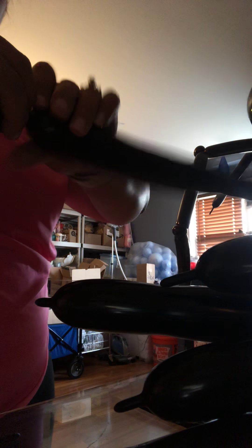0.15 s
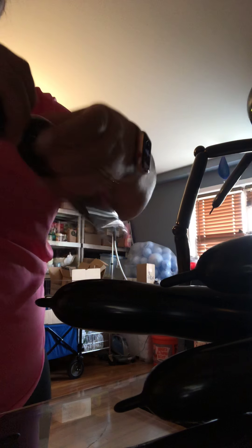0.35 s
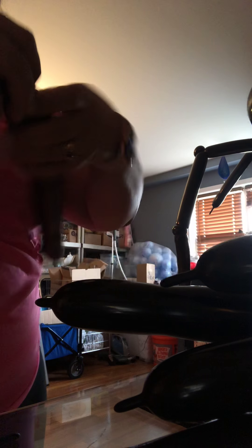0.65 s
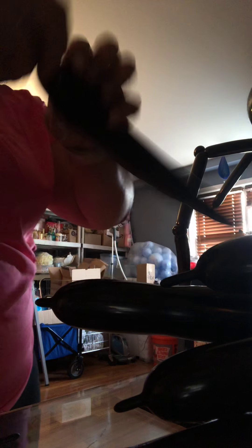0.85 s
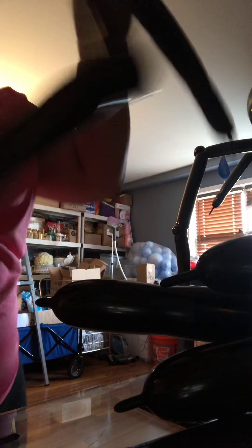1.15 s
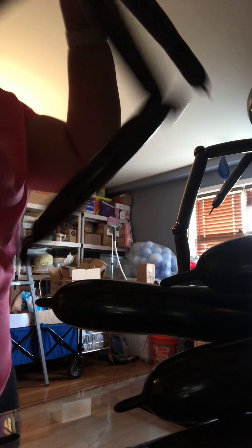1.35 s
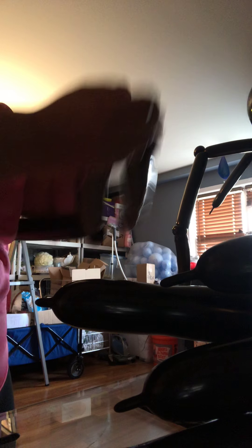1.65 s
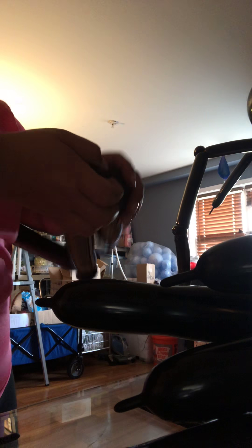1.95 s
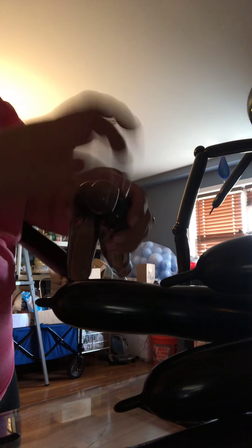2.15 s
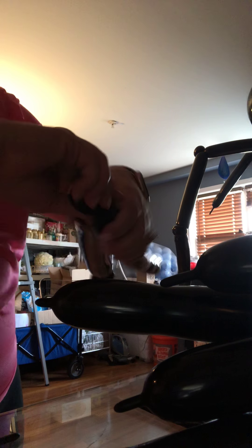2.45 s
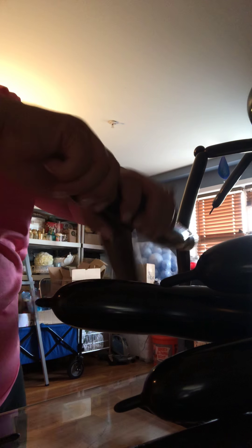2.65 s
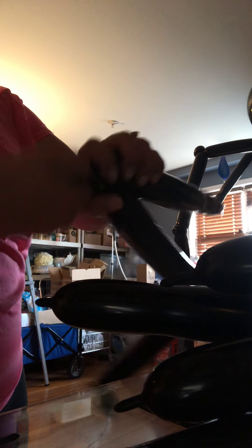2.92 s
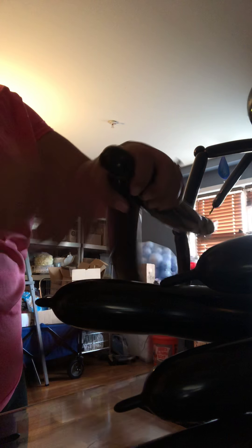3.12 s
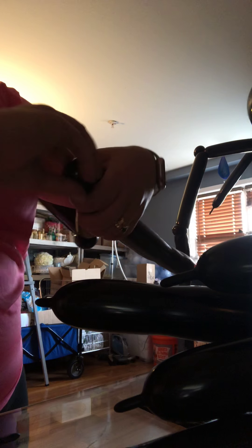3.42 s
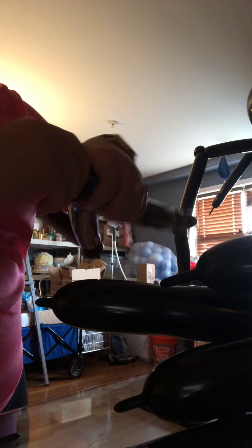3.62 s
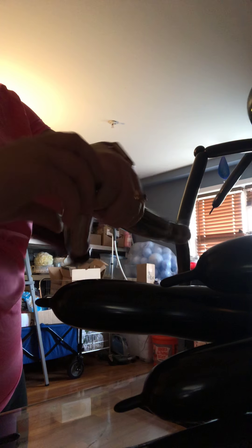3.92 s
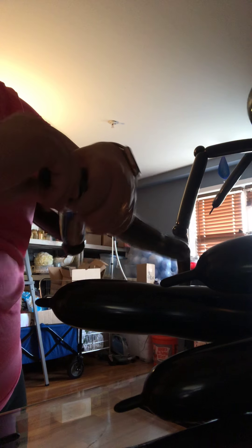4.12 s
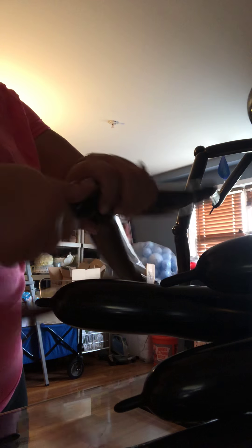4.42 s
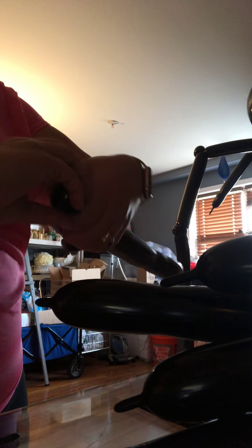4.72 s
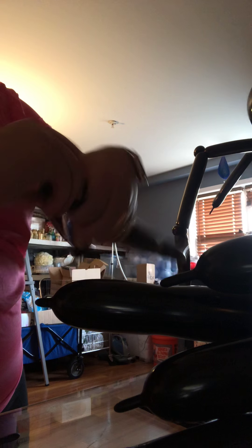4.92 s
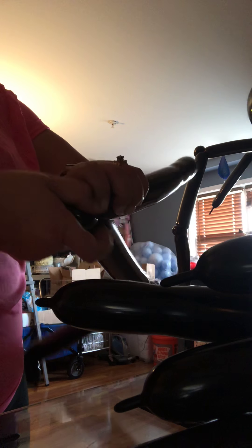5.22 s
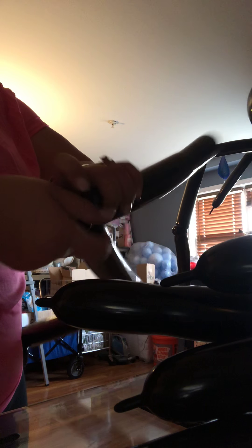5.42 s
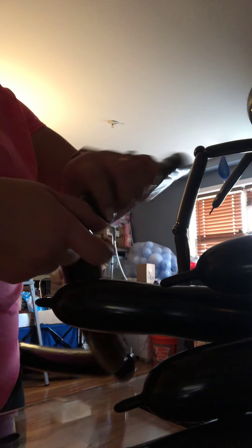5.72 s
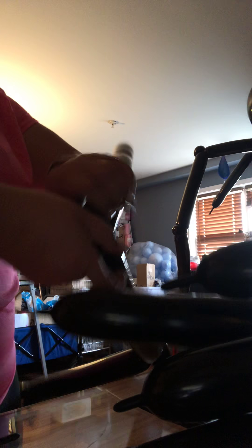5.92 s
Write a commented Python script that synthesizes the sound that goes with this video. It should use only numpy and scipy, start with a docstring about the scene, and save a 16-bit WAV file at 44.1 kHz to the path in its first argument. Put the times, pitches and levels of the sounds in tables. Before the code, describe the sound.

Close rubbery snapping, creaking and rubbing of a long balloon being pinched and twisted, with dull airy thumps in a quiet room.

```python
"""Hands twist a long latex balloon close to a phone microphone, in a furnished room with faint noise.
Scattered slips of the sticking rubber snap and ring the taut skin; the air tube thuds when pinched or bumped.
Snaps crowd together at 2.5 s; a hard thud and thin sine tones (squeaks, a held ring) come near 3 s. From 3.5 s
snaps and creaks (grainy resonant noise) thicken until past 5 s, then thin out to a last few by 6 s.
Throughout, fingers rub over the latex as gritty noise with a hiss above and a rumble below."""
import sys
import numpy as np
from scipy import signal
from scipy.fft import rfft, irfft, next_fast_len
from scipy.io import wavfile
from scipy.ndimage import uniform_filter1d, map_coordinates

SR = 44100
rng = np.random.default_rng(int(sys.argv[2]) if len(sys.argv) > 2 else 0)


def put_to_file(sound):
    """Save the sound as 16-bit audio at rate SR, in the file named by the first command-line argument."""
    columns = np.atleast_2d(sound).T  # one column per channel
    safe = np.clip(columns, -1, 1)
    whole_steps = np.round(safe * 32767)
    wavfile.write(sys.argv[1], SR, whole_steps.astype(np.int16))


N = 267844  # samples

# room and microphone noise, relative spectrum: (frequency [Hz], density [dB per Hz])
AIR_SPECTRUM = [(15, -35), (28, -19), (55, 18.5), (335, -8), (695, -5), (1440, -12), (3520, -6),
                (4140, 6.5), (4740, -10), (16000, -17)]
# the furnished room's decay: (frequency [Hz], t60 [s])
ROOM_DECAY = [(200, 0.27), (1400, 0.46), (3700, 0.32), (10000, 0.23)]
# thin tones, squeaks and a held ring: (start [s], length [s], pitch [Hz], level [dB])
THIN_TONES = [(2.92, 0.025, 1205, -42), (2.974, 0.085, 1180, -42.5), (3.16, 0.17, 1700, -42)]
# fingers on latex: (time [s], body level [dB], hiss level [dB], rumble level [dB])
RUBBING_LEVELS = [(0.0, -43, -49, -43.5), (0.29, -48.5, -56, -57), (0.83, -45, -48.5, -58),
                  (1.32, -46, -54, -56), (1.72, -43, -59, -45.5), (2.59, -47, -58, -55.5),
                  (2.74, -44.5, -68, -53), (3.09, -44, -51, -43), (3.36, -47, -62, -47.5),
                  (3.65, -43.5, -65, -44.5), (3.97, -53, -71, -47), (4.34, -40, -56, -47.5),
                  (4.51, -47, -71, -42), (4.9, -44, -58, -53.5), (5.09, -42, -51, -45.5),
                  (5.27, -37, -64, -42.5), (5.6, -43.5, -49, -48.5), (6.07, -41.5, -47, -47.5)]
# resonances of the taut latex: (centre [Hz], width [Hz], level [dB])
SKIN_MODES = [(1370, 640, 2.5), (2470, 1470, 4.5), (3468, 1040, 1), (4235, 240, 1), (5290, 310, -2.5)]
# relative spectrum of the latex hiss: (frequency [Hz], density [dB per Hz])
HISS_SPECTRUM = [(4500, -120), (6000, 1), (7400, 2), (9000, -4), (15500, -6.5)]
# resonances of the air tube: (centre [Hz], width [Hz], level [dB])
TUBE_MODES = [(72, 36, -2), (140, 16.5, 2), (218.8, 32, 3), (368, 51, 3.5), (510, 50, -3.5), (864, 470, -9)]
# pinches and bumps of the air tube: (time [s], nominal peak [dB], nominal pitch [Hz])
THUDS = [(0.088, -26.5, 680), (0.094, -27.5, 88), (0.114, -38, 342), (0.237, -17.5, 219),
         (0.429, -23.5, 469), (0.703, -23, 376), (0.837, -39, 645), (1.101, -37, 80.4), (1.619, -33, 127),
         (1.68, -36.5, 197), (1.786, -43, 300), (1.803, -32.5, 860), (1.876, -37, 347), (1.879, -36.5, 794),
         (1.956, -34, 870), (2.353, -30, 865), (2.382, -32.5, 840), (2.637, -31, 410), (2.745, -36.5, 207),
         (2.899, -26, 139.3), (2.925, -31, 148), (2.969, -32.5, 222), (2.995, -39, 250), (3.09, -11.5, 370),
         (3.09, -22, 860), (3.328, -22.5, 295), (3.336, -16.5, 420), (3.621, -36, 610), (3.938, -25.5, 350),
         (4.471, -30, 610), (4.576, -32.5, 370), (4.662, -19.5, 374), (4.969, -22.5, 554),
         (4.981, -20, 960), (5.186, -40, 410), (5.289, -52, 197), (5.793, -22, 218), (5.797, -31, 101),
         (6.05, -25, 560)]
# the skin rings on after a big snap: (start [s], ring [Hz], level [dB], t60 [s])
AFTER_RINGS = [(0.518, 2050, -37, 0.31), (0.869, 1373, -33.5, 0.72), (2.116, 580, -43.5, 1),
               (2.116, 1524, -32, 0.47), (2.116, 2970, -37, 0.75), (3.094, 924, -31.5, 0.51),
               (3.097, 1340, -29.5, 0.46), (3.12, 1630, -42.5, 1), (3.632, 1314, -37.5, 0.64),
               (3.805, 1250, -39, 0.23), (5.903, 1450, -43, 0.55)]
# modes of that ringing: (multiple of the ring [1], width as a share of the ring [1], level [dB])
AFTER_MODES = [(0.42, 0.21, -9.5), (1, 0.11, 8.5), (1.21, 0.089, 3), (1.42, 0.14, -1.5), (1.85, 0.081, -1)]
# hoarse creaks, where the slips run together:
# (start [s], end [s], resonance [Hz], first level [dB], last level [dB])
CREAKS = [(0.836, 0.873, 1440, -25.5, -30), (1.164, 1.255, 4160, -68, -58), (1.345, 1.443, 4200, -49, -54),
          (1.74, 1.814, 2170, -59, -41), (2.347, 2.376, 1880, -34, -47), (2.525, 2.606, 2060, -67, -34),
          (3.578, 3.614, 2240, -38, -51), (3.927, 3.963, 2470, -34, -29), (4.001, 4.03, 4380, -34, -52),
          (4.14, 4.207, 1950, -27, -35), (4.233, 4.283, 4350, -31, -38.5), (4.372, 4.464, 2720, -25, -31.5),
          (4.456, 4.531, 2440, -41, -25.5), (4.924, 4.949, 4300, -27, -27), (4.982, 5.02, 3280, -14, -45),
          (5.065, 5.081, 2290, -26.5, -15.5), (5.229, 5.285, 1940, -25, -42), (5.328, 5.37, 760, -43, -42),
          (5.419, 5.517, 800, -47, -43), (5.732, 5.771, 2240, -24.5, -42), (6.038, 6.067, 2640, -33.5, -33)]
# single stick-slip snaps:
# (time [s], nominal peak [dB], low ring [Hz], brightness [dB], crack against the peak [dB])
SLIPS = [(0.0034, -17.5, 2210, 4, -2.5), (0.028, -15.5, 2010, 7.5, -14), (0.0876, -16, 2060, 7, -4),
         (0.2406, -31.5, 1400, -7, -5), (0.38, -17, 2390, 4.5, -4.5), (0.4808, -25, 1560, -2, -33),
         (0.5157, -4.5, 2230, 8, -5.5), (0.7037, -14, 2420, 5, -8.5), (0.8086, -22, 1420, 16, -1),
         (0.858, -11, 1590, 2, -15), (0.8626, -7.5, 1530, 1, -26), (1.1216, -24.5, 2660, 4, -2),
         (1.4224, -24, 1750, 8, 1.5), (1.449, -24, 1695, 1, -3.5), (1.746, -24.5, 2240, 2, -20),
         (1.7816, -18, 2160, -3, -11), (1.8034, -18, 2260, 7, -8), (1.961, -20, 1650, -6, -29),
         (1.9964, -20.5, 2340, 5, 2), (2.2194, -22.5, 1820, 11, -6.5), (2.3833, -24, 1900, 0, -7),
         (2.4005, -17.5, 2310, 7, -1), (2.4366, -36, 2380, 0, 12), (2.447, -17, 2190, 17, -10),
         (2.4686, -17, 2520, 20, -6), (2.4957, -17, 2400, 10, -4), (2.508, -15.5, 2310, 7, -2),
         (2.5235, -9.5, 2120, 4.5, -4), (2.5429, -8.5, 2250, 1, -6), (2.5486, 1, 2280, 20, -6),
         (2.5593, -6.5, 2114, 2.5, -14), (2.8878, -15.5, 1660, 8, 3), (2.8978, -7.5, 2230, 10, -6.5),
         (3.0419, -14, 2470, 8.5, -14), (3.111, -17, 1760, -3, -3), (3.327, -32, 3240, -9, -12),
         (3.3381, -15, 2390, -24, -30), (3.5154, -12.5, 2220, -5, 0.5), (3.5695, -2.5, 2544, 2, -8.5),
         (3.628, 2, 2110, 10.5, -29), (3.68, -7.5, 2380, 12, -9), (3.697, -16, 2250, -7, -4),
         (3.716, -13, 2320, 6, -8.5), (3.7312, -15.5, 2250, 4, -13), (3.7598, -16, 2234, 2, -13),
         (3.801, -14.5, 2243, -4, -10), (3.9188, -16, 2300, 3, -5), (3.9284, -14, 2320, 3, -3),
         (3.938, -8, 2540, 6, -9), (3.9439, -3, 2017, 7, -10.5), (3.9592, -7, 2380, 7, -1),
         (3.9924, -20, 2060, 12, -2), (4.0045, -3, 2220, 9.5, -9), (4.0116, -9.5, 2080, 13, -5),
         (4.0367, -13, 2560, 4, -11), (4.1276, -12, 2200, 18, -9.5), (4.141, -9.5, 1920, 15, -5),
         (4.197, -10, 2240, 5, 3.5), (4.206, -9, 2360, 9, -1), (4.2332, -17, 2270, 15, -9),
         (4.3176, -3.5, 2575, 10, -10), (4.374, -4, 2223, 2.5, -2.5), (4.391, -4.5, 2026, 4.5, -18),
         (4.4081, -3.5, 2670, 3, -5), (4.4357, -14, 2550, 11, -12), (4.4574, -18, 2110, 0, -19),
         (4.4703, -2.5, 2495, 4.5, -3), (4.5079, -13, 2380, -1, -4), (4.668, -32, 1170, 0, -11),
         (4.8318, -7.5, 2148, -1, -4), (4.908, -17, 2210, 5, -3), (4.9146, -10.5, 2235, 4, -6),
         (4.9205, -12, 2180, 7, -1), (4.9594, -16, 2370, 0, -3), (4.965, -4.5, 2710, 28, -1),
         (4.9682, -2.5, 2657, 3.5, -5), (4.9809, 3.5, 2270, 7.5, -27), (5.122, -21.5, 2500, 2, -12),
         (5.1334, -12.5, 2380, 16, -13), (5.1497, -7, 2310, 9, -10), (5.1702, -6, 2460, 13, -8),
         (5.1908, 0, 2170, 3.5, -16), (5.1961, -8, 2260, 1, -10), (5.2151, -4, 2298, -2.5, -3),
         (5.232, -17, 2240, -2, -5), (5.2616, -15, 2530, 8, -10), (5.346, -24.5, 2200, -3, -21),
         (5.384, -9.5, 2320, 6.5, -11), (5.6087, -23.5, 2380, 7, -23), (5.7356, -9.5, 2090, 11, -21),
         (5.754, -17.5, 2250, 9, -8), (5.7835, -22, 2400, 8, -4), (5.8396, -4.5, 2360, 3.5, -6.5),
         (5.8505, -3, 2640, 2.5, -14), (5.8728, -7.5, 2640, 8, -10.5), (5.8991, 0.5, 2530, 3.5, -14.5)]
# runs of slips at a nearly steady pace: (start [s], end [s], pace [slips per s], first level [dB],
# last level [dB], mean low ring [Hz], mean brightness [dB], mean crack against the peak [dB])
RUNS = [(0.838, 0.844, 277, 0.5, -15, 1573, 1.5, -11), (2.1092, 2.12, 258, -1, -12.5, 2394, -4.5, -10.5),
        (3.0923, 3.098, 490, -2.5, -15.5, 1730, 2.5, -5), (2.577, 2.598, 204, -8.5, -5.5, 2343, 9.5, -8.5),
        (3.577, 3.602, 195, -11, -16.5, 2240, -3, -7), (4.1502, 4.175, 170, -11, -16, 2097, 6, -0.5),
        (4.9255, 4.944, 210, -12.5, -26, 4250, -10, -4), (5.02, 5.038, 115, -13, -16, 2600, 8, -12),
        (5.0415, 5.063, 225, -14.5, -13.5, 2410, 11, -6.5), (1.222, 1.237, 92, -33, -29, 2800, 27, -24),
        (4.626, 4.682, 77, -31, -33, 2260, -13, -17), (4.703, 4.788, 48, -23.5, -26, 2150, 1.5, -12),
        (5.502, 5.54, 62, -24, -14.5, 2230, 9, -8), (6.0518, 6.066, 140, -11.5, -14.5, 2353, 1.5, -5)]

TONE_FADE_DB_PER_S, TONE_WAVER = 50, 0.004  # waver as a share of the pitch
THUD_FLOOR_HZ = 63  # the tube radiates little below
SLAP_DB, SLAP_T60_S = -3, 0.047  # skin slap against a thud
SLAP_LOW_HZ, SLAP_HIGH_HZ = 600, 3570
RASP_DB = 0  # broad rasp against a creak's resonance
CRACK_BODY_DB = -7.5  # gain of a crack's mid band beside its hiss
# scatter within a run: share of a gap, dB, share of the pitch
PACE_JITTER, SIZE_SCATTER_DB, RING_SCATTER = 0.06, 1.5, 0.038
TOP_HZ = 16000  # the microphone's band limit


def amp(db):
    """Gain of a level in dB."""
    return 10 ** (np.asarray(db) / 20)


def unit(x):
    """x at rms 1."""
    return x / np.sqrt(np.mean(x ** 2) + 1e-20)


def along(points, hz):
    """Values of (Hz, value) points read on a log frequency axis."""
    f, v = np.transpose(points)
    return np.interp(np.log(hz + 1), np.log(f + 1), v)


def curves(rows):
    """One value per sample for each column after the time."""
    s, *cols = np.transpose(rows)
    return [np.interp(np.arange(N) / SR, s, c) for c in cols]


def wobble(rate):
    """A smooth random curve, rate knots a second."""
    knots = rng.standard_normal(int(N * rate / SR) + 4)
    return map_coordinates(knots, [np.arange(N) * rate / SR])


def filtered(x, response):
    """x times a complex response of frequency."""
    m = next_fast_len(N + SR // 2)
    return irfft(rfft(x, m) * response(np.fft.rfftfreq(m, 1 / SR)), m)[..., :N]


def placed(times, shapes):
    """Each row of shapes laid down at its time."""
    at = np.round(times * SR).astype(int)[:, None] + np.arange(shapes.shape[1])
    return np.bincount(at.ravel(), shapes.ravel(), N + SR)[:N]


def modes(table):
    """The causal response of a set of resonances, alternating in sign."""
    def response(f):
        return sum((-1) ** k * amp(db) * 1j * f * w / (c * c - f * f + 1j * f * w)
                   for k, (c, w, db) in enumerate(table))
    return response


def slap_band(f):
    """The broad middle band in which struck skin speaks."""
    return 1j * f / (SLAP_LOW_HZ + 1j * f) * (SLAP_HIGH_HZ / (SLAP_HIGH_HZ + 1j * f)) ** 2


def gritty(rate, spread_db, smooth):
    """Noise sprinkled with tiny slips of random size, rate a second, over a smooth share."""
    sizes = amp(spread_db * rng.exponential(size=N).clip(0, 3))
    ticks = (rng.random(N) < rate / SR) * sizes
    puffs = signal.lfilter([1], [1, -np.exp(-1 / (0.0023 * SR))], ticks)  # each dies over 2.3 ms
    return rng.standard_normal(N) * (smooth + unit(puffs))


def still_air():
    """Steady, faint room and microphone noise, shaped by its spectrum."""
    noise = rng.standard_normal(N)
    return amp(-60) * unit(filtered(noise, lambda f: amp(along(AIR_SPECTRUM, f))))


def room(x, count=12):
    """The room's answer, each frequency dying at its own speed, redrawn for each of count equal stretches."""
    out = np.zeros(N + SR)
    for part in np.array_split(np.arange(N), count):
        hz, t, grains = signal.stft(rng.standard_normal(SR // 2), SR, nperseg=256)
        decay = amp(-60 * t / along(ROOM_DECAY, hz)[:, None])
        tail = signal.istft(grains * decay, SR, nperseg=256)[1]
        wet = signal.fftconvolve(x[part], tail / np.linalg.norm(tail))
        out[part[0] + 150:][:len(wet)] += wet  # 150 samples (3.4 ms) late
    return out[:N]


def thin_tones():
    """Short, faint sine tones, squeaks and a held ring, that nearly hold their pitch and fade."""
    out, t = np.zeros(N), np.arange(N) / SR
    cycles_per_hz = np.cumsum(1 + TONE_WAVER * wobble(40)) / SR
    for s, length, hz, db in THIN_TONES:
        on = uniform_filter1d(1. * (t > s) * (t < s + length), size=300)
        level = amp(db - TONE_FADE_DB_PER_S * np.abs(t - s))
        out += on * level * np.sin(2 * np.pi * hz * cycles_per_hz)
    return out


def rubbing():
    """Fingers drag on the skin: gritty noise in its resonances, which come and go, a hiss above, a rumble below."""
    body_db, hiss_db, rumble_db = curves(RUBBING_LEVELS)
    drag_db = 1.8 * wobble(25)
    grit = gritty(rate=150, spread_db=5.5, smooth=1.5)
    skin = sum(amp(2.67 * wobble(8)) * filtered(grit, modes([mode])) for mode in SKIN_MODES)
    body = amp(body_db + drag_db) * unit(skin)
    hiss = unit(filtered(grit, lambda f: amp(along(HISS_SPECTRUM, f))))
    hiss = amp(hiss_db + 0.5 * drag_db + 2.9 * wobble(5.84)) * hiss
    # every mode of the tube swells and fades on its own
    rumble = unit(sum(amp(4.5 * wobble(9)) * filtered(rng.standard_normal(N), modes([mode]))
                      for mode in TUBE_MODES))
    return body + hiss + amp(rumble_db) * rumble


def thuds():
    """A soft push: a few cycles that drop fast, then sag, in pitch, the skin slaps and the air tube hums on."""
    s, db, hz = np.transpose(THUDS)[:, :, None]
    t = np.arange(SR // 8) / SR
    peak = 0.846 / hz  # the swell peaks after a little under one cycle
    swell = t / peak * np.exp(1 - t / peak)
    sag = 0.62 * peak * (1 - np.exp(-t / peak))
    drop = 0.7 * peak * (1 - np.exp(-3.5 * t / peak))
    push = swell * np.sin(2 * np.pi * hz * (0.831 * t + sag + drop))
    # the tube wobbles after the push; mostly motion slower than the push itself is left
    noise = rng.standard_normal(push.shape)
    shake = [unit(uniform_filter1d(row, size=int(SR / (2 * f)))) for row, f in zip(noise, hz[:, 0])]
    hum = filtered(placed(s[:, 0] + 0.00388, amp(db - 60 * t / 0.054) * shake), modes(TUBE_MODES))
    slap = amp(db + SLAP_DB - 60 * t / SLAP_T60_S) * rng.standard_normal(push.shape)
    slap = filtered(placed(s[:, 0] + 0.003, slap), slap_band)
    thud = placed(s[:, 0] + 0.00292, amp(db) * push) + amp(-3.0) * hum + slap
    return filtered(thud, lambda f: (1j * f / (THUD_FLOOR_HZ + 1j * f)) ** 3)


def after_rings():
    """After a big snap the skin keeps shaking in a few modes, and dies away."""
    out, t = np.zeros(N), np.arange(N) / SR
    for s, hz, db, t60 in AFTER_RINGS:
        table = [(k * hz, share * hz, level) for k, share, level in AFTER_MODES]
        shaking = unit(filtered(rng.standard_normal(N), modes(table)))
        out += (t > s) * amp(db - 60 * np.abs(t - s) / t60) * shaking
    return out


def creaks():
    """Grainy noise around each creak's resonance, with a broad rasp from the whole skin."""
    out, grit = np.zeros(N), gritty(rate=700, spread_db=5.5, smooth=0.55)
    rasp = filtered(grit, lambda f: modes(SKIN_MODES)(f) + amp(-7.0 + along(HISS_SPECTRUM, f)))
    for start, end, hz, first_db, last_db in CREAKS:
        a, b = round(start * SR), min(round(end * SR), N)
        band = signal.butter(1, [hz - 200, hz + 220], "bandpass", fs=SR)
        t = np.arange(b - a) / SR
        edges = np.clip(np.minimum(t / .0015, t[::-1] / .006), 0, 1)  # 1.5 ms in, 6 ms out
        fade = edges * amp(np.linspace(first_db, last_db, b - a))
        resonance = unit(signal.lfilter(*band, grit[a:b]))
        out[a:b] += fade * (resonance + amp(RASP_DB) * unit(rasp[a:b]))
    return out


def slip_rows():
    """Single snaps and the slips of every run, as rows like those of the single snaps."""
    rows = [np.array(SLIPS)]
    for start, end, rate, first_db, last_db, hz, bright_db, crack_db in RUNS:
        s = np.arange(start, end, 1 / rate)
        pace, size, ring, bright, crack = rng.standard_normal((len(s), 5)).T
        db = np.interp(s, [start, end], [first_db, last_db]) + SIZE_SCATTER_DB * size
        rows.append(np.transpose([s + PACE_JITTER * pace / rate, db, hz * (1 + RING_SCATTER * ring),
                                  bright_db + SIZE_SCATTER_DB * bright,
                                  crack_db + SIZE_SCATTER_DB * crack]))
    return np.vstack(rows)


def slips():
    """Each slip rings the skin for a few cycles, low and high, and cracks; its lows arrive a little late."""
    s, db, hz, bright_db, crack_db = slip_rows().T[:, :, None]
    high_share = 1 / (1 + amp(-2 * bright_db))  # of the power
    t = np.arange(SR // 40) / SR
    draw = rng.standard_normal((len(s), 4))
    # after the snap the ring scatters round the skin and flutters
    noise = rng.standard_normal((len(s), len(t)))
    flutter = unit(uniform_filter1d(noise, size=16, axis=1))

    def snap(peak, t60):
        """A fast swell, then a fluttering decay."""
        scatter = 0.44 * flutter * amp(-60 * t / t60) * (1 - np.exp(-t / peak))
        return t / peak * np.exp(1 - t / peak) + scatter

    partner_hz = hz * (0.762 + 0.05 * draw[:, [0]])
    low = np.sin(2 * np.pi * hz * t) + 0.23 * np.sin(2 * np.pi * partner_hz * t)
    high = sum(amp(level - 8) * np.sin(2 * np.pi * c * (1 + 0.0884 * draw[:, [k + 1]]) * t)
               for k, (c, _, level) in enumerate(SKIN_MODES[2:]))
    # bending waves in the skin are slower the lower they are: a falling chirp
    chirp_cycles = 300 * t + 4 * (1 - np.exp(-t / 0.0032))
    sweep = amp(-18.0 - 60 * t / 0.031) * np.sin(2 * np.pi * chirp_cycles)
    rings = np.sqrt(1 - high_share) * (snap(0.00056, 0.035) * low + sweep)
    rings = rings + np.sqrt(high_share) * snap(0.00043, 0.018) * high
    crack = amp(crack_db) * snap(0.00046, 0.019) * rng.standard_normal((len(s), len(t)))
    cracks = filtered(placed(s[:, 0], amp(db) * crack),
                      lambda f: amp(along(HISS_SPECTRUM, f)) + amp(CRACK_BODY_DB) * slap_band(f))
    return placed(s[:, 0], amp(db) * rings) + cracks


def scene():
    """The balloon up close, the room's answer to its snaps and thuds, and the still air."""
    snaps, bumps = slips() + creaks() + after_rings(), thuds()
    wet = room(amp(-13) * snaps + amp(-5.0) * bumps)
    return (still_air() + wet + thin_tones() + rubbing() + bumps + snaps)[None]


def record(dry):
    """The phone drops the deepest bass, rounds off the highest peaks and keeps nothing above its band limit."""
    dry = filtered(dry, lambda hz: (1j * hz / (50 + 1j * hz)) ** 2)
    held = dry / (1 + np.abs(dry / .93) ** 5) ** (1 / 5)
    return filtered(held, lambda hz: hz < TOP_HZ)


dry = scene()
out = record(dry)
put_to_file(out)
```